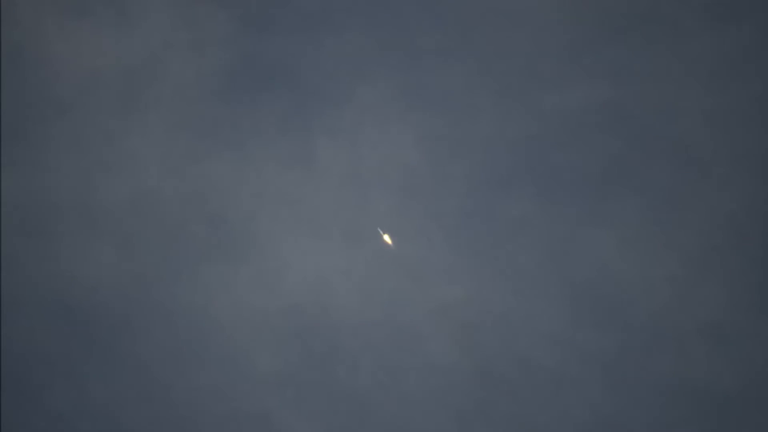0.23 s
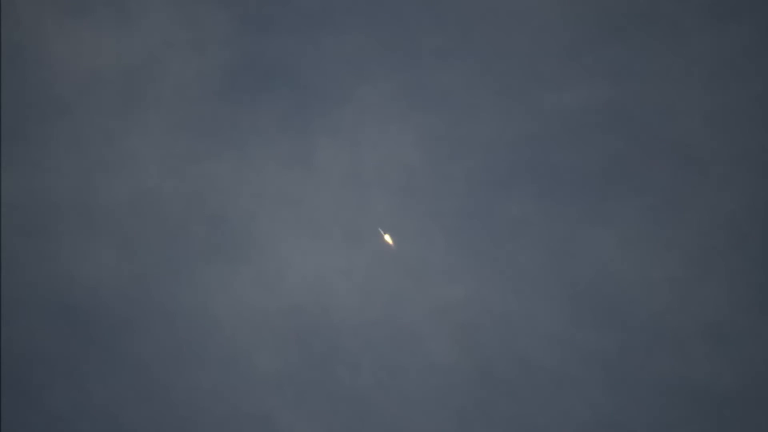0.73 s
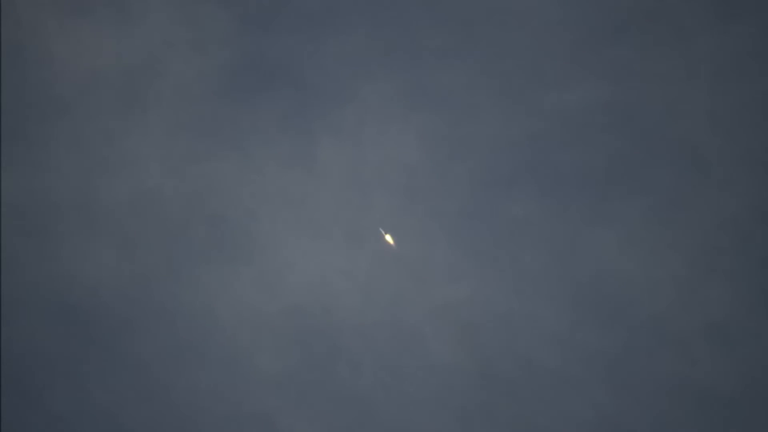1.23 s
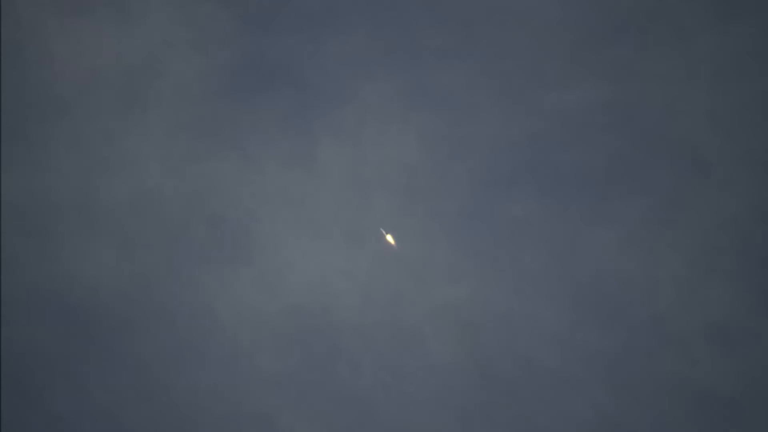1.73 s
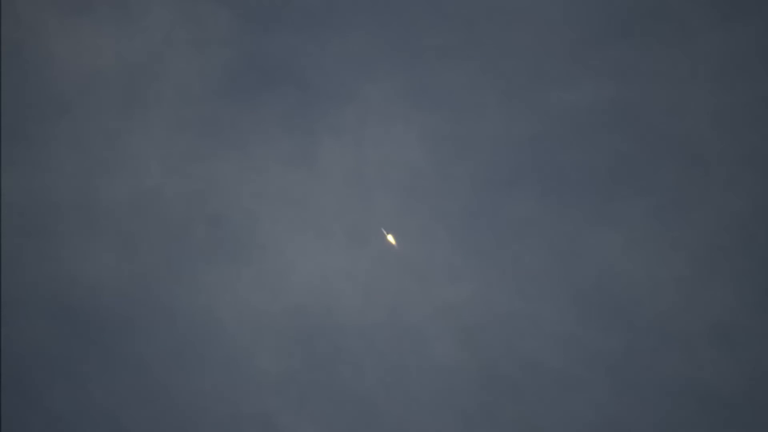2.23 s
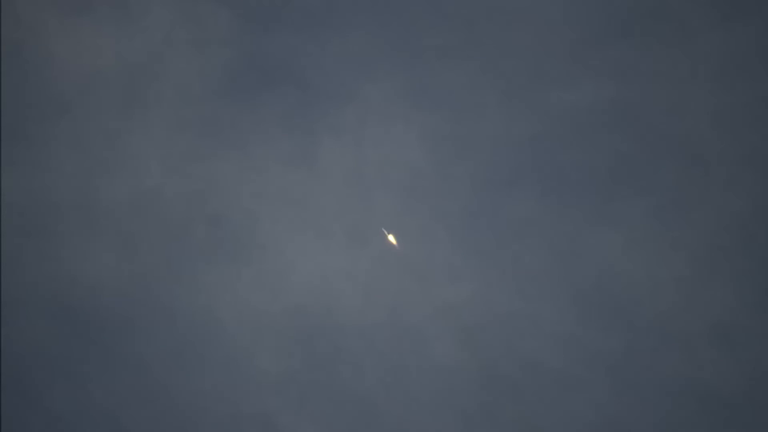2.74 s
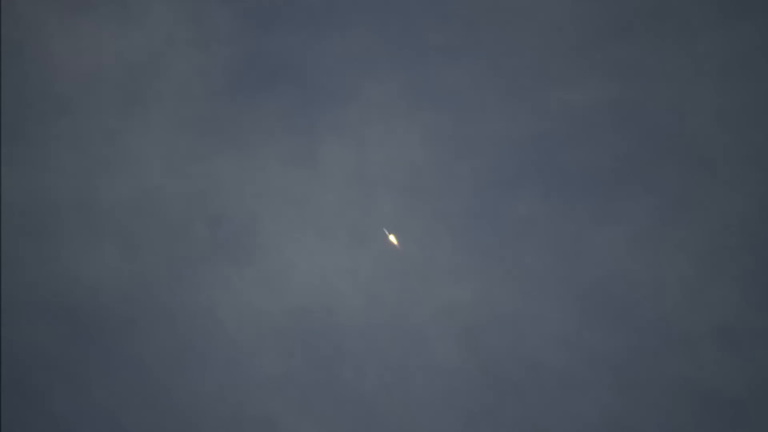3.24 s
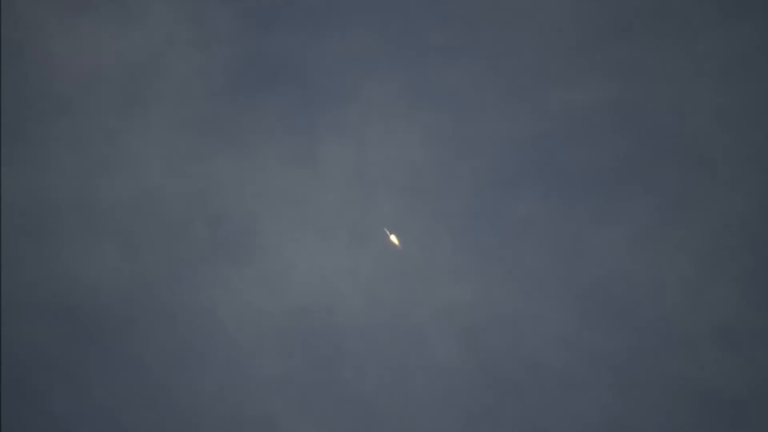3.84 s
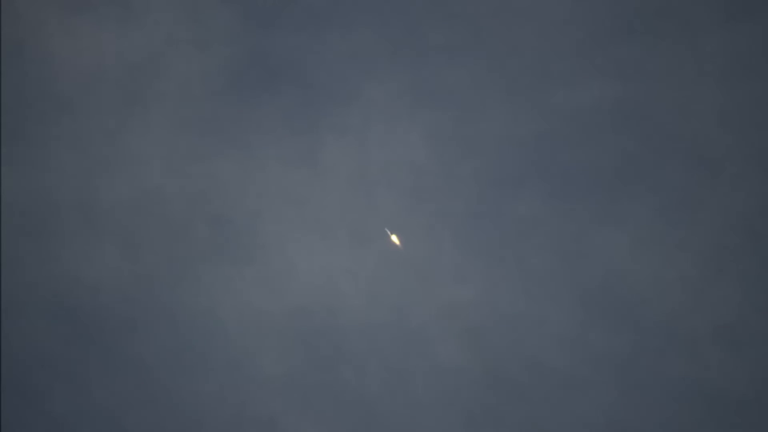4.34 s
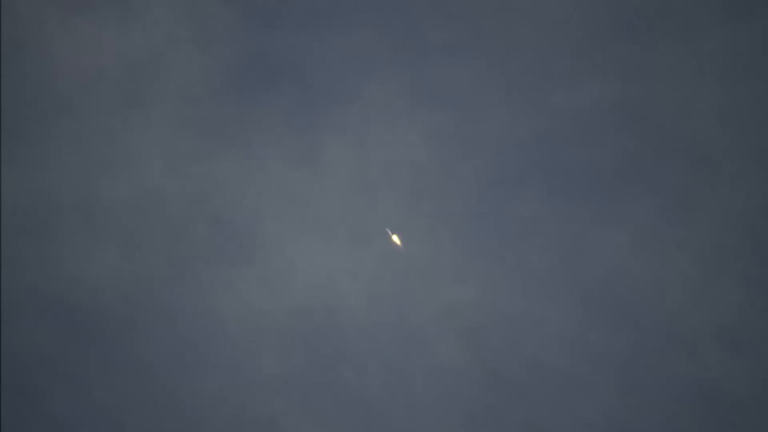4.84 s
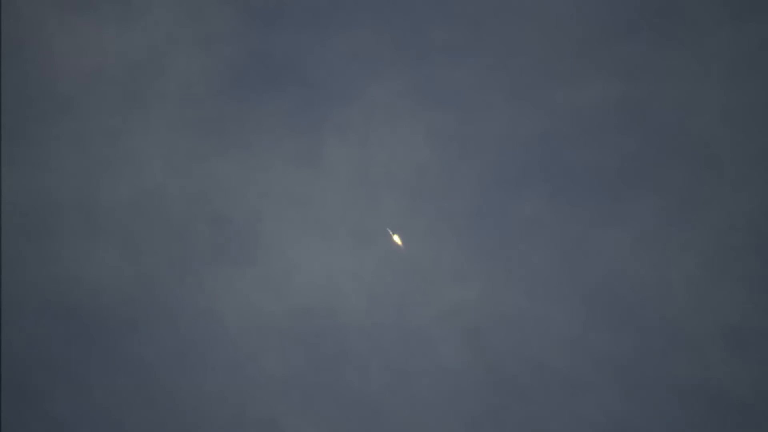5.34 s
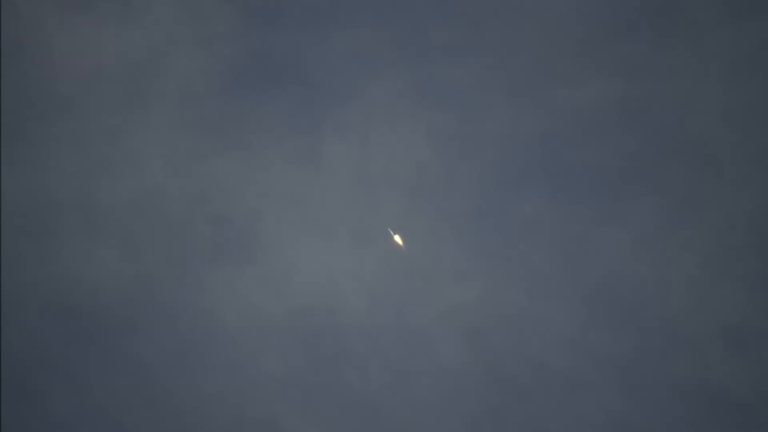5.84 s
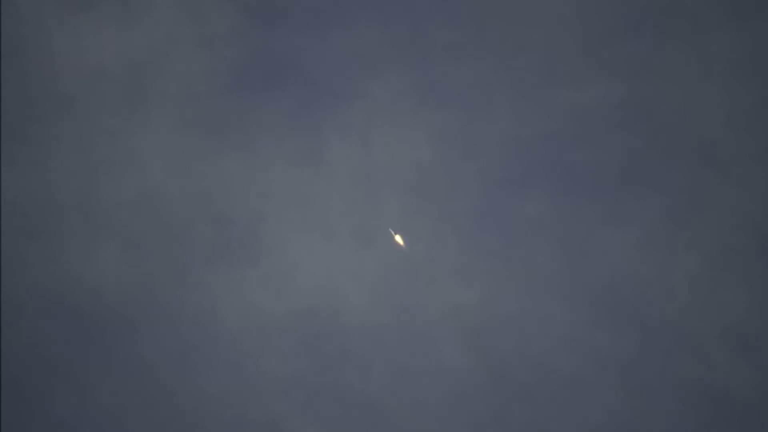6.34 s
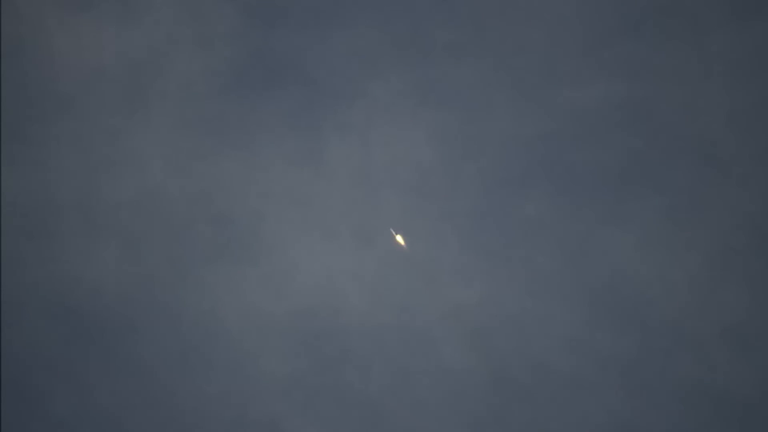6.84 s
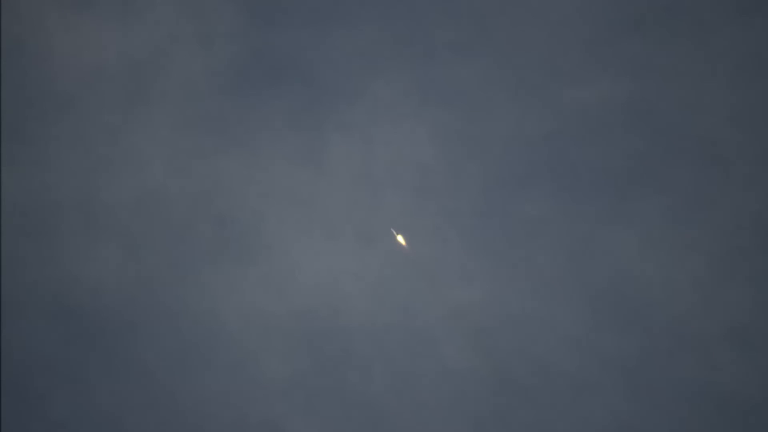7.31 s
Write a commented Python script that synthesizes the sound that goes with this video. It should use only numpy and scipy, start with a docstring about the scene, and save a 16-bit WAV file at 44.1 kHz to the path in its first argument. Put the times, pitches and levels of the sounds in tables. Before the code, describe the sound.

Heard from open ground, a faraway climbing rocket gives a deep, turbulent roar. At first it is mostly bassy rumble with muffled thumps and faint thin ticks. Near three seconds sharp cracks break out, ease into duller pops, then return as a dense bright tearing crackle around five seconds. It softens again and regains some edge at the end. A close stereo microphone pair catches short ground reflections, with loud peaks held down.

```python
"""Open country, where a rocket climbs far away. Turbulent exhaust makes a rumble, built from coloured noise.
Its strongest waves have steepened into shocks that arrive as crackle: sudden pressure jumps that sag back,
sharp when the air lets the treble through. The ground repeats each wave, two hard surfaces echo it, and the
surroundings smear it, and more rumble rolls back from the far landscape. A close pair of microphones with a
limiter picks it all up. Thin dry ticks sound over the early roar."""
import sys
import numpy as np
from scipy import signal
from scipy.fft import rfft, irfft, next_fast_len
from scipy.io import wavfile
from scipy.ndimage import uniform_filter1d

SR = 44100
rng = np.random.default_rng(int(sys.argv[2]) if len(sys.argv) > 2 else 0)


def store_wav(level_fs):
    """Save 16-bit WAV to argv[1]."""
    pcm = np.round(np.clip(np.atleast_2d(level_fs), -1, 1) * 32767)
    wavfile.write(sys.argv[1], SR, pcm.T.astype(np.int16))


N = 333837


def amp(db):
    """Decibels to gain."""
    return 10 ** (np.asarray(db) / 20)


def rms_one(x):
    """Scale to an rms (average strength) of 1."""
    return x / np.sqrt(np.mean(x ** 2) + 1e-20)


def in_time(rows):
    """Columns of a curve over time, one value per sample."""
    time_s, *columns = np.transpose(rows)
    return [np.interp(np.arange(N) / SR, time_s, column) for column in columns]


def on_grid(rows):
    """Columns of a spectrum at the frequencies of a whole-length transform."""
    hz, *columns = np.transpose(rows)
    grid_hz = np.maximum(np.fft.rfftfreq(next_fast_len(N), 1 / SR), 1)
    return [np.interp(np.log(grid_hz), np.log(hz), column) for column in columns]


def shaped(x, response):
    """Filter by a frequency response."""
    size = next_fast_len(N)
    return irfft(rfft(x, size) * response, size)[..., :N]


def high_pass(x, low_hz, order=1):
    """Weaken what lies below low_hz."""
    return signal.sosfilt(signal.butter(order, low_hz, "high", fs=SR, output="sos"), x)


def rumble(spectrum, level_db):
    """Turbulent mixing noise: random noise given a spectrum and a level that changes with time."""
    colour_db, = on_grid(spectrum)
    noise = shaped(rng.standard_normal(N), amp(colour_db))
    return amp(level_db) * rms_one(noise)


def exhaust_rumble():
    """The deep roar of the exhaust mixing with the air."""
    # balance of low and high in the roar: pitch_hz [Hz], relative_level_db [dB per Hz]
    roar_spectrum = [(11, -36.5), (18, -3), (49, 2.5), (138, 7), (196, 1.5), (439, -4), (657, -8.5),
                     (792, -15), (1040, -20.5), (1590, -29.5), (3030, -55.5), (11000, -79), (14300, -117),
                     (22000, -120)]
    # strength of the roar: time_s [s], level_db [dB]
    roar_level = [(0, -21.5), (2.3, -20), (3.0, -25.5), (4.0, -24), (4.9, -31.5), (5.7, -28), (6.5, -26.5),
                  (7.57, -29.5)]
    return rumble(roar_spectrum, *in_time(roar_level))


def rounded(corner_hz, order):
    """Slope of a jump of height 1 after a chain of equal low-passes."""
    step = np.arange(240) + .5
    front = step ** (order - 1) * np.exp(-2 * np.pi * corner_hz * step / SR)
    return front / front.sum(axis=-1, keepdims=True)


def shocks(at, jump_db, corner_hz, steep_db, fall_hz):
    """Sudden jumps that sag back; the air rounds most of each front and leaves a share of it steep."""
    steep = np.clip(amp(steep_db), 0, 1)[:, None]
    soft_hz = np.clip(corner_hz, 800, 14000)[:, None]
    front = (1 - steep) * rounded(soft_hz, order=5)

    # a smaller steep share is duller, and more of its treble is strewn over a longer tail
    steep_hz = 21000 * steep ** 0.28
    whole = steep ** 0.056
    front = front + steep * whole * rounded(steep_hz, order=2)

    # eddies on the way crumple the steep share into a brief tearing tail
    steepest_tear_s, tear_db, tear_band_hz = 0.0018, -17.5, [2000, 8800]
    dying = np.exp(-np.arange(front.shape[1]) * whole / (steepest_tear_s * SR))
    noise = dying * rng.standard_normal(front.shape)
    tear = signal.lfilter(*signal.butter(1, tear_band_hz, "band", fs=SR), noise)
    front = front + steep * amp(tear_db) * tear

    # place every front at its moment, then sum the slopes up into pressure that leaks away
    place = at[:, None] + np.arange(front.shape[1])
    sized = amp(jump_db)[:, None] * front
    slope = np.bincount(place.ravel(), sized.ravel(), N + front.shape[1])[:N]
    sag = np.exp(-2 * np.pi * fall_hz / SR)
    return signal.lfilter([-1], [1, -sag], slope)


def small_shocks(wake_db):
    """Weaker shocks at random moments, each of its own size; clearer air rounds them less."""
    # usual jump of a small shock before the wake is added: time_s [s], jump_db [dB]
    small_level = [(0, -19.5), (0.3, -19), (0.43, -15.5), (0.58, -20.5), (2.3, -19.5), (3.0, -21.5),
                   (3.8, -22.5), (4.4, -23.5), (5.0, -26), (5.7, -25.5), (6.3, -27), (7.0, -27.5),
                   (7.57, -23.5)]
    # clearness of the air, as the usual share of a small front left steep: time_s [s], steep_db [dB]
    clear_air = [(0.0, -43), (0.3, -43), (0.5, -38.5), (0.57, -47), (1.9, -40.5), (2.36, -44.5), (2.4, -33),
                 (2.53, -45), (2.86, -40), (2.9, -15), (3.01, -14), (3.12, -33.5), (3.2, -29),
                 (3.44, -39.5), (3.5, -13.5), (3.6, -36.5), (3.75, -45.5), (4.24, -32), (4.9, -15.5),
                 (5.5, -23.5), (5.63, -37), (5.95, -44.5), (6.92, -33.5), (7.57, -29.5)]
    rate_per_s, size_spread_db, steep_spread_db = 520, 5.5, 4.5
    level_db, = in_time(small_level)
    steep_db, = in_time(clear_air)
    at = np.flatnonzero(rng.random(N) < rate_per_s / SR)
    size_chance, corner_chance, steep_chance = rng.standard_normal((3, len(at)))
    corner_hz = 2100 * amp(0.2 * (steep_db[at] + 34.0) + 0.93 * corner_chance)
    jump_db = level_db[at] + wake_db[at] + size_spread_db * size_chance
    return shocks(at, jump_db, corner_hz, steep_db[at] + steep_spread_db * steep_chance, fall_hz=263)


def ground(x):
    """The direct wave plus its reflection and one rebound; moving air makes the lag waver."""
    # echo off the ground: time_s [s], lag_ms [ms], strength_db [dB], lag_waver_ms [ms],
    # treble_db (the echo's treble against the rest of it) [dB]
    ground_echo = [(0, 1.966, -6, 0.28, 1.5), (2.2, 2.244, -5.5, 0.37, -1.5), (2.8, 2.04, -6, 0.14, 2.5),
                   (3.5, 2.017, -5, 0.13, -10), (4.0, 2.294, -2.5, 0.14, -0.5),
                   (4.8, 2.38, -2.5, 0.028, -5.5), (5.4, 2.374, -1.5, 0.17, 0), (6.3, 2.357, 0.5, 0.23, -1),
                   (7.0, 2.446, 1, 0.14, -16), (7.57, 2.52, -2, 0.13, 0)]
    treble_from_hz = 2500
    rebound_db = -9.5   # how far the second echo lies under a lossless repeat of the first
    lag_ms, echo_db, waver_ms, treble_db = in_time(ground_echo)

    # a new random lag every 400 samples, with straight lines between
    sample = np.arange(N)
    knots = np.arange(0, N + 400, 400)
    lag_ms = lag_ms + waver_ms * np.interp(sample, knots, rng.standard_normal(len(knots)))
    lag = lag_ms * SR / 1000
    echo = np.interp(sample - lag, sample, x)
    rebound = np.interp(sample - 2 * lag, sample, x)

    echo = echo + (amp(treble_db) - 1) * high_pass(echo, treble_from_hz)
    return x + amp(echo_db) * echo + amp(2 * echo_db + rebound_db) * rebound


def scatter(x, t60_s, low_hz, channels, count=5):
    """Many small reflections smear every front into a tail; the paths keep changing as the source moves."""
    t = np.arange(9000) / SR
    # noise that dies by 60 dB in t60_s; the first 2.5 ms stay silent
    tails = rng.standard_normal((count, channels, len(t))) * amp(-60 * t / t60_s) * (t > .0025)
    tails = high_pass(tails, low_hz)
    tails = tails / np.sqrt(np.sum(tails ** 2, axis=-1, keepdims=True))
    turn = np.arange(N) / (.06 * SR)   # one step every 0.06 s
    out = 0
    for k, tail in enumerate(tails):
        # each set of paths fades in and out in its turn, at even power
        away = np.minimum(np.abs((turn - k + count / 2) % count - count / 2), 1)
        heard = x * np.cos(np.pi / 2 * away)
        out = out + signal.fftconvolve(heard[None], tail)[:, :N]
    return out


def walls(x):
    """Single echoes from two hard surfaces nearby."""
    # the two surfaces: lag_ms [ms], strength_db [dB]
    hard_surfaces = [(7.4, -17), (13.2, -27.5)]
    return sum(amp(echo_db) * np.roll(x, int(lag_ms * SR / 1000)) for lag_ms, echo_db in hard_surfaces)


def rolling_rumble():
    """Rumble that rolls back from the far landscape, made as separate coloured noise."""
    # its balance of low and high: pitch_hz [Hz], relative_level_db [dB per Hz]
    rolling_spectrum = [(11, -43.5), (50, -10), (110, 0.5), (170, 3.5), (260, -7.5), (450, -17),
                        (1000, -22), (2500, -45.5), (22000, -130)]
    # its strength: time_s [s], level_db [dB]
    rolling_level = [(0, -32), (2.5, -31), (4.5, -28.5), (6.0, -32.5), (7.57, -26)]
    return rumble(rolling_spectrum, *in_time(rolling_level))


def ticks():
    """Thin single clicks with the bass and the very top taken off."""
    # dry ticks on the early roar: start_s [s], relative_level_db (before gain and filter) [dB]
    tick_list = [(0.1283, -60), (0.2754, -53), (0.4216, -63), (0.4431, -55), (0.454, -52), (0.6196, -48),
                 (0.7089, -51), (0.8323, -49), (0.9534, -51), (1.0572, -61), (1.0806, -49), (1.0894, -42),
                 (1.119, -51), (1.1699, -49.5), (1.247, -53), (1.2806, -47), (1.347, -50), (1.3849, -49),
                 (1.4203, -53), (1.5301, -50), (1.592, -47), (1.6992, -51), (1.7221, -55), (1.7421, -51),
                 (1.781, -54), (1.811, -53), (2.0564, -57), (2.1996, -56), (2.2524, -54), (2.3377, -58)]
    band_hz, gain_db = [1500, 7000], 12
    start_s, relative_level_db = np.transpose(tick_list)
    clicks = np.bincount((start_s * SR).astype(int), amp(relative_level_db + gain_db), N) + 1e-18
    return signal.sosfilt(signal.butter(1, band_hz, "band", fs=SR, output="sos"), clicks)


def loud_shocks():
    """The loud crackle: strong shocks at set moments; also returns their places and jumps."""
    # the loud shocks: start_s [s], jump_db (pressure jump) [dB],
    # steep_db (share of the front left steep) [dB]
    loud_list = [(0.3748, -10.5, -34), (0.4202, -10.0, -33), (0.4436, -7, -49), (0.484, -13, -29),
                 (0.51, -12.0, -41), (0.532, -14, -39.5), (0.9607, -13, -51), (1.117, -6.5, -48),
                 (1.3498, -7.5, -46), (1.6332, -7, -50), (1.7811, -6.5, -47), (2.0004, -2.0, -50),
                 (2.252, -7, -46), (2.381, -10.5, -25), (2.4086, -8.5, -42.5), (2.443, 0.5, -44.5),
                 (2.5047, -8.0, -41), (2.6, -7.5, -41.5), (2.7074, -6, -47.5), (2.796, -8.5, -19),
                 (2.8336, -11.5, -31), (2.8446, -13, -48), (2.888, -5.5, -13), (2.901, -11.5, -3.5),
                 (2.9152, -19.5, -11), (2.9406, -6.5, -8), (2.9545, -16.5, -17), (2.9606, -10.5, -35),
                 (2.999, -3.5, -13.0), (3.054, -17, -25), (3.0707, -5.5, -40), (3.1455, -8.5, -24),
                 (3.172, -10.5, -23.0), (3.188, -14.5, -14), (3.218, -9.5, -49), (3.2411, -9, -38.0),
                 (3.248, -6, -31), (3.2584, -18, -6.5), (3.2723, -6.5, -52), (3.3054, -23, -10),
                 (3.3182, -9.5, -52), (3.354, -8.5, -36), (3.3884, -5.5, -28), (3.4225, -8, -50),
                 (3.438, -14, -47), (3.4723, -11.5, -40), (3.4892, -10, -20), (3.498, -15.5, -19),
                 (3.562, -9.5, -21), (3.6039, -7, -43), (3.6276, -5.5, -40), (3.6515, -11.5, -42),
                 (3.6826, -15, -35), (3.7046, -4.5, -48), (3.7244, -10, -47.5), (3.7888, -11, -48.5),
                 (3.8117, -11, -32), (3.861, -7, -49), (3.8988, -9, -36.5), (3.9723, -9.5, -39.5),
                 (4.0153, -9.5, -48), (4.05, -8.0, -42), (4.091, -12.5, -40), (4.165, -5.0, -58),
                 (4.186, -6.5, -62), (4.1944, -6.5, -49), (4.2764, -8.5, -25), (4.3037, -3, -51.0),
                 (4.3424, -9, -28), (4.3773, -9.5, -35), (4.4005, -9, -47), (4.4504, -7, -63),
                 (4.4597, -7.5, -47), (4.4724, -7, -29.5), (4.523, -10, -17), (4.5355, -9.5, -30),
                 (4.5562, -8.5, -34), (4.5791, -5, -44), (4.593, -11.5, -30.0), (4.6114, -8.5, -35),
                 (4.629, -9, -37), (4.6466, -4, -11.5), (4.6831, -7.5, -16), (4.731, -8.5, -27),
                 (4.75, -4.5, -49), (4.7689, -9.5, -9.5), (4.7909, -7, -15), (4.8071, -12.5, -21),
                 (4.8281, -5.5, -5.5), (4.858, -5.5, 0), (4.8791, -11.5, -17.0), (4.9001, -6.5, -14),
                 (4.91, -8.5, -13), (4.935, -6.5, -4.5), (4.955, -10, -15), (4.9706, -8.5, -9.0),
                 (4.9923, -5, -8), (5.0345, -4.5, 0), (5.0742, -7.5, -9), (5.121, -7.5, -11),
                 (5.1392, -10, -34.0), (5.1636, -8, -14.5), (5.1727, -10.5, -5.5), (5.1979, -8.0, -32),
                 (5.2099, -11.5, -27), (5.2226, -9.5, -9.5), (5.2361, -12, -13), (5.2581, -7, -41),
                 (5.293, -7.5, -11.5), (5.3237, -9.5, -43), (5.3374, -8, -39), (5.3825, -5, -32),
                 (5.405, -7, -16), (5.4364, -12, -13), (5.471, -11, -10), (5.4918, -4, -47.0),
                 (5.5035, -13.5, -37), (5.5342, -8, -33), (5.5671, -6, -37.5), (5.6108, -8, -53),
                 (5.6825, -8.5, -41.5), (5.733, -6.5, -44), (5.7573, -7.5, -51), (5.7936, -7, -31),
                 (5.8005, -11.5, -46.0), (5.8147, -4.5, -41.5), (5.8551, -7, -36.0), (5.8792, -8.0, -49),
                 (5.9173, -8, -58), (5.9794, -4.5, -50.5), (5.9945, -6.0, -50.5), (6.0221, -10.5, -49),
                 (6.0802, -8.5, -46.0), (6.117, -8, -53), (6.126, -7.5, -54.0), (6.1893, -9.0, -41),
                 (6.2058, -5, -55.5), (6.2309, -6.5, -50.0), (6.246, -6.5, -51), (6.2833, -8.5, -43.5),
                 (6.2971, -9.5, -53), (6.3123, -8.5, -44), (6.3464, -8.0, -48.0), (6.3633, -13, -32),
                 (6.3843, -6, -55), (6.4137, -12.0, -29), (6.4456, -6, -39), (6.465, -10.5, -36),
                 (6.5058, -8.5, -39.5), (6.5485, -7, -43), (6.5668, -11, -45.5), (6.6066, -9.5, -49),
                 (6.6468, -7, -37), (6.686, -8.5, -50), (6.7321, -14, -31), (6.7609, -10, -37),
                 (6.78, -10.5, -30.5), (6.8027, -10.5, -32), (6.8269, -9.5, -40), (6.8454, -8, -43),
                 (6.8643, -7, -37), (6.9345, -8, -31), (6.9572, -7.5, -43), (6.9924, -8, -37.0),
                 (7.0235, -7, -39), (7.0325, -10, -28), (7.0646, -9.5, -35.5), (7.0895, -10, -33.5),
                 (7.1156, -9.5, -35), (7.143, -5.5, -43), (7.1602, -11.5, -23), (7.1797, -9.0, -30),
                 (7.1952, -9.5, -23), (7.2254, -7, -30), (7.2602, -7, -36.5), (7.3003, -7.5, -17),
                 (7.3284, -8.5, -22.5), (7.3455, -12.5, -24), (7.3722, -14, -18.5), (7.3893, -6.0, -51),
                 (7.4167, -7.0, -35), (7.4336, -12, -31), (7.457, -11.5, -19), (7.474, -2, -44),
                 (7.4879, -7.5, -36), (7.5138, -8.5, -26), (7.5249, -11, -23), (7.5503, -2, -30)]
    start_s, jump_db, steep_db = np.transpose(loud_list)
    at = (start_s * SR).astype(int)
    # the steeper a loud front, the less the rest of it is rounded
    corner_hz = 2810 * amp(0.28 * (steep_db + 37.5))
    return shocks(at, jump_db, corner_hz, steep_db, fall_hz=238), at, jump_db


def wake(at, jump_db):
    """Gain in dB that leaps with each loud shock and dies away, so small ones crowd louder behind it."""
    wake_gain, wake_s = 1.5, 0.0021
    kicks = np.bincount(at, amp(jump_db), N)
    dying = signal.lfilter([1], [1, -np.exp(-1 / (wake_s * SR))], kicks)
    return 20 * np.log10(1 + wake_gain * dying)


def microphone_pair(near, wide):
    """Near sound reaches both microphones almost alike; the wide scatter differs between them."""
    # left against right: pitch_hz [Hz], lead_rad [radians], level_db [dB],
    # apart_db (filter on the scatter that differs) [dB]
    left_right = [(20, -.18, 0, -40), (60, -.36, -.2, -34), (150, -.58, -.3, -18), (500, -.5, -1.2, -17),
                  (800, -.15, -1, -15), (2000, -.1, -1.2, -8), (5000, .15, -.3, -9), (11000, .1, 0, -8)]
    lead_rad, level_db, apart_db = on_grid(left_right)
    side = np.array([[.5], [-.5]])   # left and right each take half the difference
    near_pair = shaped(near, np.exp(1j * side * lead_rad) * amp(side * level_db))
    return near_pair + shaped(wide, amp(apart_db))


def scene():
    """Exhaust through air, ground and surroundings to the two microphones."""
    loud, at, jump_db = loud_shocks()
    direct = exhaust_rumble() + small_shocks(wake(at, jump_db)) + loud
    # rough ground close by reaches both microphones alike, the wider surroundings each one differently
    rough_ground = amp(-19) * scatter(direct, t60_s=0.014, low_hz=258, channels=1)[0]
    near = ground(direct) + rough_ground
    near = near + walls(near) + rolling_rumble() + ticks()
    wide = amp(4.5) * scatter(direct, t60_s=0.081, low_hz=163, channels=2)
    return microphone_pair(near, wide)


def limiter(x, top_db, release_db_s, attack_s):
    """Gain drops on peaks over the top and climbs back at a steady rate."""
    climb = release_db_s * np.arange(N) / SR
    over_db = np.maximum(20 * np.log10(np.abs(x).max(axis=0) + 1e-9) - top_db, 0)
    held_db = np.maximum.accumulate(over_db + climb) - climb
    # look half a window ahead, then smooth; both channels share one gain
    size = int(attack_s * SR) + 1
    ahead_db = np.append(held_db[size // 2:], held_db[-(size // 2):])
    return x * amp(-uniform_filter1d(ahead_db, size))


def record(dry):
    """The recorder lets the treble arrive first, cuts deep bass, lifts treble, limits, and cuts the top."""
    fade_in, fade_out = np.arange(N) / 600, (N - np.arange(N)) / 150
    x = dry * np.minimum(np.minimum(fade_in, fade_out), 1)
    for hz in (300, 38):
        # all-pass: delays what lies under hz
        c = (1 - np.tan(np.pi * hz / SR)) / (1 + np.tan(np.pi * hz / SR))
        x = signal.lfilter([c, -1], [1, -c], x)
    x = high_pass(x, 26, order=2)
    peak_hz, width_hz, peak_gain = 8000, 17000, 0.092   # broad treble lift
    x = x + peak_gain * signal.lfilter(*signal.iirpeak(peak_hz, peak_hz / width_hz, SR), x)
    x = limiter(x, top_db=-10.5, release_db_s=222.5, attack_s=0.001)
    x = x + amp(-89.0) * rng.standard_normal(x.shape)   # circuit hiss
    # steep cut: 60 dB down from 11900 Hz up
    return signal.sosfilt(signal.cheby2(14, 60, 11900, fs=SR, output="sos"), x)


dry = scene()
out = record(dry)
store_wav(out)
```